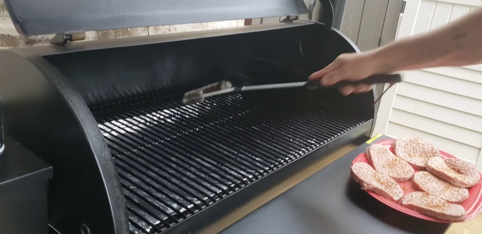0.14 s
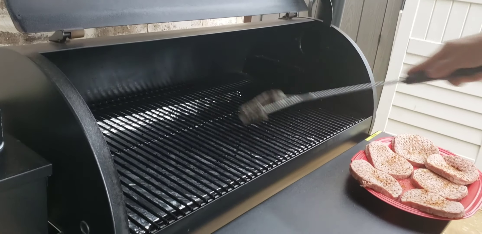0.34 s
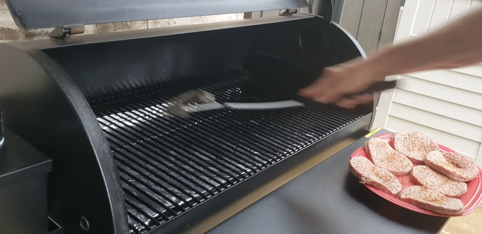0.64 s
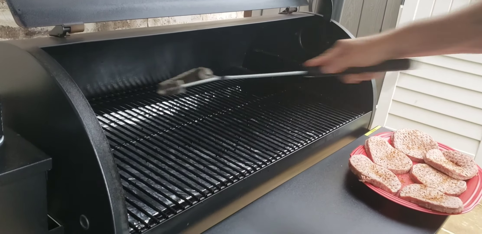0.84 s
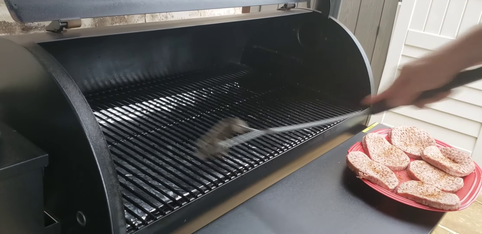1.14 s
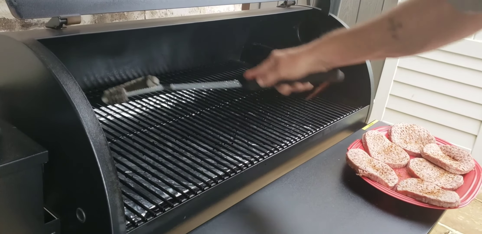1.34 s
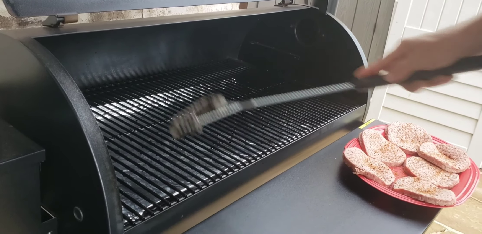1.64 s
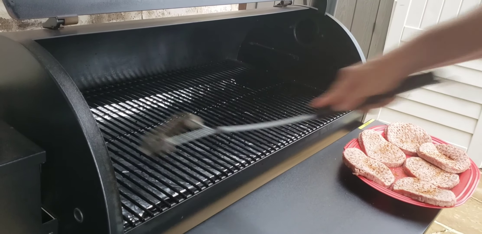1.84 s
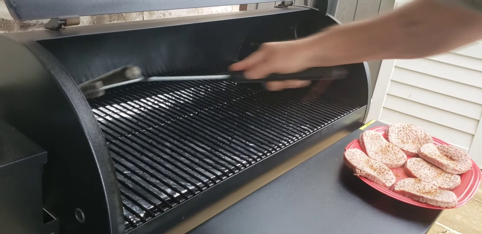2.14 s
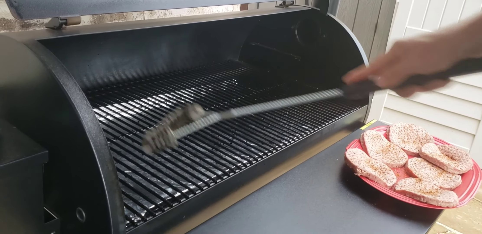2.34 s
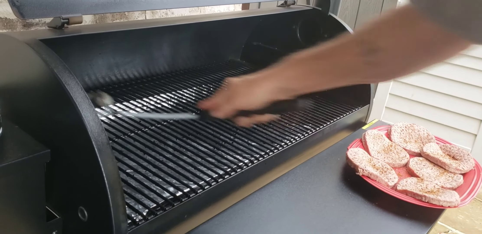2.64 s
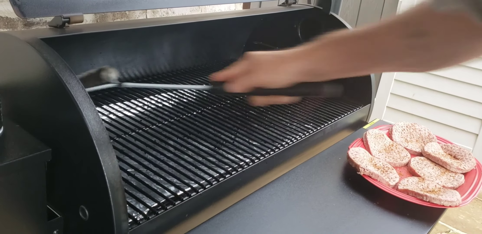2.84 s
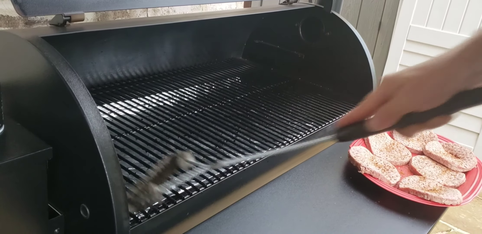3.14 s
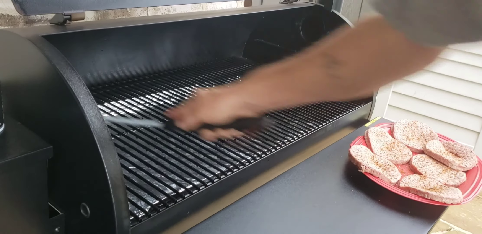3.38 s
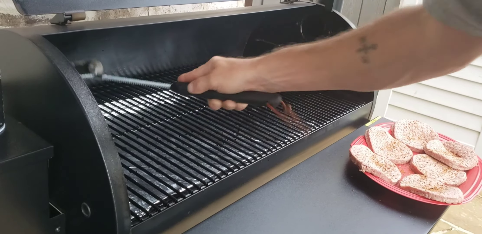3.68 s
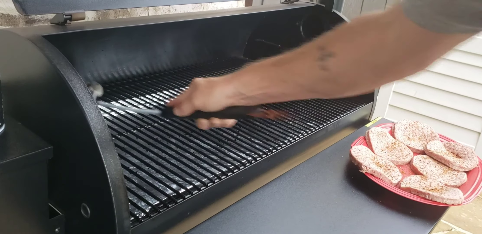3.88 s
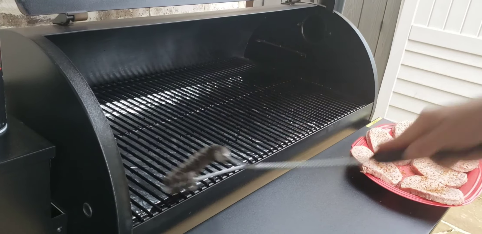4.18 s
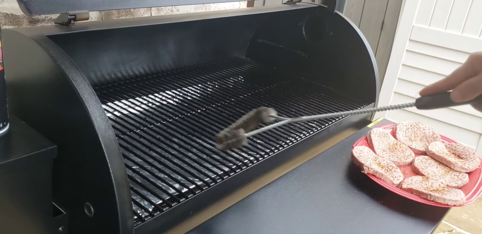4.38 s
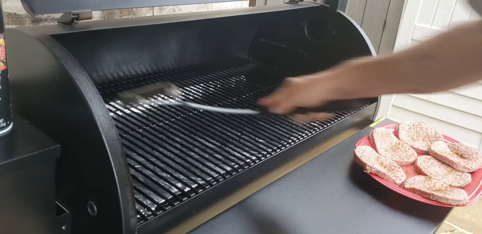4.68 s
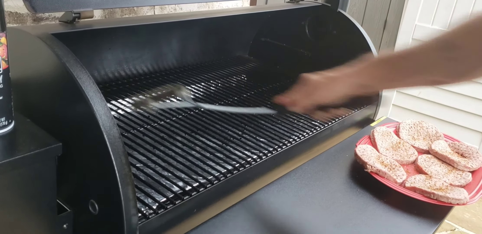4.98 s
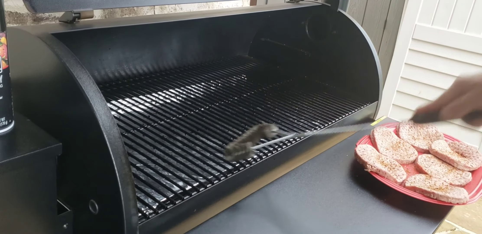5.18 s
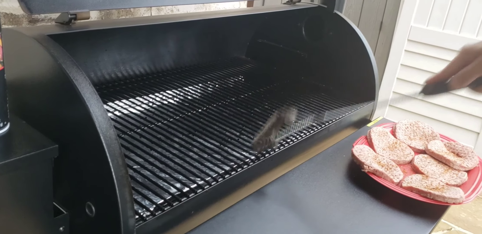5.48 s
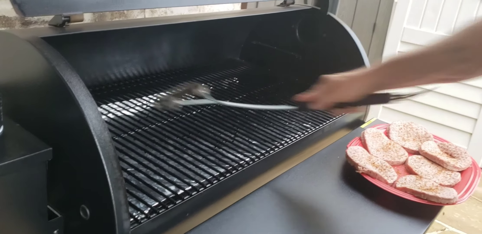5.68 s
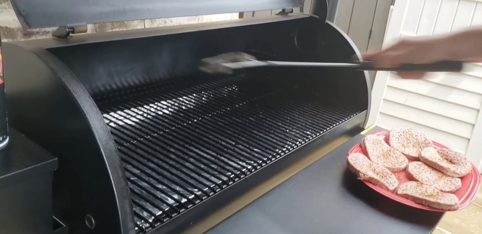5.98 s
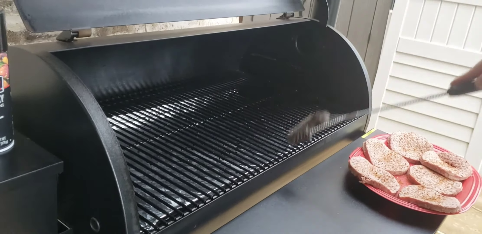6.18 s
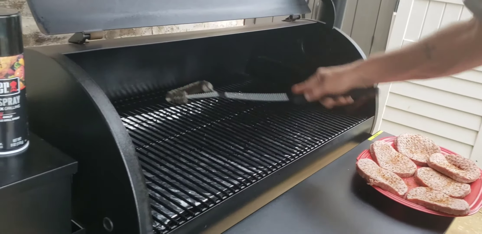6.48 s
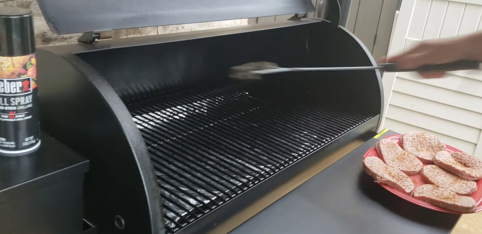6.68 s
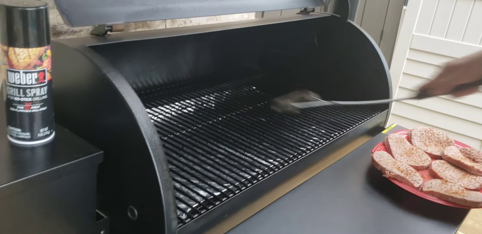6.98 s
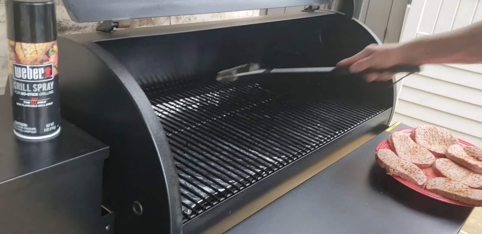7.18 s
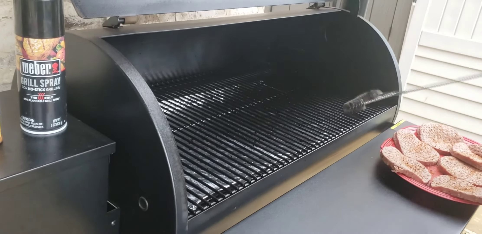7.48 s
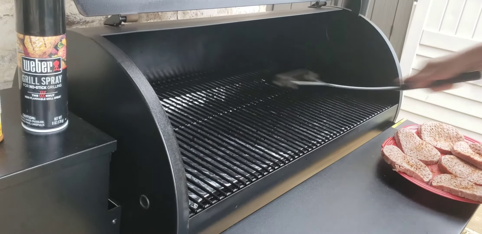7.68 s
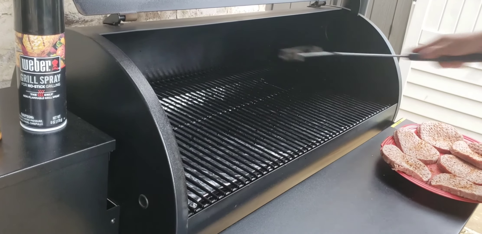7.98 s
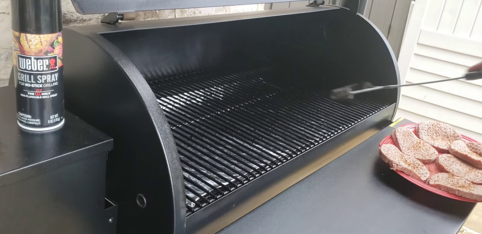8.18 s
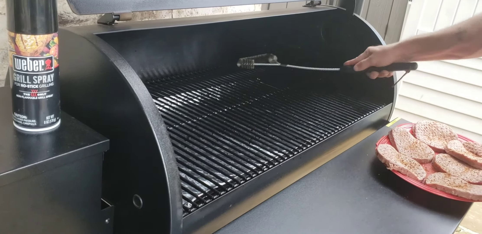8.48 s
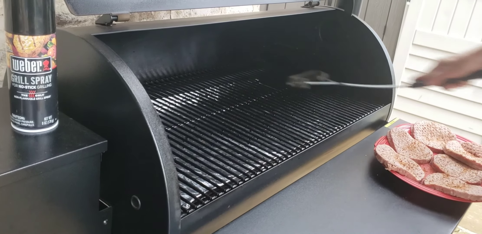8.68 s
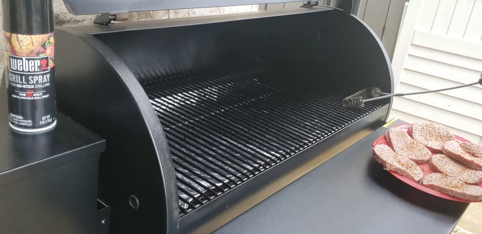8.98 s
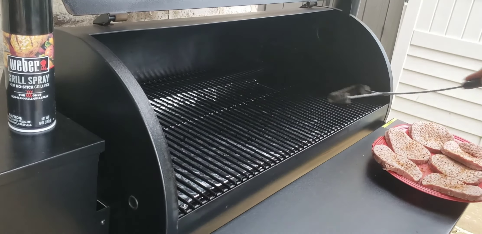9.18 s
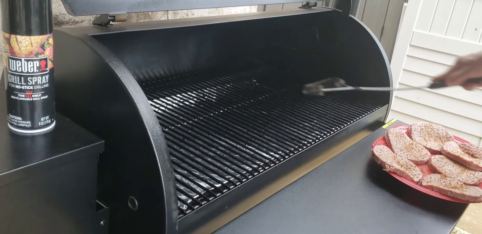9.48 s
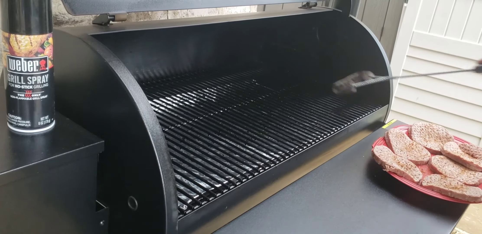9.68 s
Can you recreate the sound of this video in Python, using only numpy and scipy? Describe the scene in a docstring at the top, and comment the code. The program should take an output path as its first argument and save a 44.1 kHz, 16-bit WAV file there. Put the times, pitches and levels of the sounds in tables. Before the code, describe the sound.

An open barrel grill drones steadily outdoors, its fan motor humming under a soft rush of fire. A wire brush scrubs the metal grate in quick, repeated strokes, each a bright, scratchy hiss with occasional tiny snaps and thin squeaks. Many strokes make the loose grate clatter and the barrel give a short, low boom. The brushing gets lighter near the end. It is heard from about an arm's length.

```python
"""Outdoors at an open barrel grill, a wire brush scrubs the grate about an arm's length from a phone. The fan-
fed fire drones at the pitches the barrel favours, over the hum of the fan motor. On each stroke the bristles
hiss along the bars; wires squeak as the brush lands, and some catch and snap free. The brush head makes the
loose grate clatter, and the barrel answers with a low boom."""
import sys
import numpy as np
from scipy import signal
from scipy.fft import rfft, irfft, next_fast_len
from scipy.io import wavfile

SR = 44100
rng = np.random.default_rng(int(sys.argv[2]) if len(sys.argv) > 2 else 0)


def master(y):
    """Save y as 16-bit WAV."""
    cut = np.clip(np.atleast_2d(y).T, -1, 1)
    pcm = np.round(cut * 32767)  # scale
    wavfile.write(sys.argv[1], SR, pcm.astype(np.int16))


N = 433503
TIME = np.arange(N) / SR
TOP_HZ = 15780  # the phone cuts off sound above this

# the broad rush of fan and flame: pitch_hz, level_db
FIRE_RUSH = [(28, -88), (48, -71), (400, -100), (750, -68.5), (1100, -75), (1400, -77), (1850, -80.5),
             (2500, -80), (3400, -86), (5000, -88), (6500, -94.5), (7600, -94.5), (9000, -101),
             (15500, -100.5)]
# where the air in the barrel and fire pot rings: pitch_hz, width_hz, level_db, change_when_aside_db
BARREL_RESONANCES = [(62.7, 13, -59.5, 1), (78, 18, -65.5, -7), (90, 8, -74, -4), (119, 14.5, -45.5, -0.5),
                     (130.4, 19.5, -48.5, 0.5), (142.7, 9.4, -46.5, -8), (192.3, 22.6, -52.5, -1),
                     (223, 18, -51, -2.5), (249, 16, -56.5, 4.5), (257, 31, -58, -3),
                     (308.8, 42.6, -52.5, -4), (379, 35, -66, 1), (450.4, 23, -54.5, 1.5),
                     (482, 23, -54, 3), (517, 79, -62, -4), (576, 21.5, -66, 3.5), (681, 72, -70.5, 6),
                     (908, 26, -64.5, -4.5), (1043, 21, -69, 3.5), (1161, 43, -64, -2.5),
                     (1285, 72, -69, -3), (1386, 31, -67.5, -2.5), (1526.5, 85, -63.5, 0.5),
                     (1681, 33, -68.5, -1.5), (1924, 22, -69, -5), (2137, 86, -78, 6)]
# the phone moves aside: time_s, share_of_the_way (0 to 1)
PHONE_MOVE = [(5.5, 0.28), (7.6, 1)]
# the fan's motor hums and its blades whine: pitch_hz, level_db
FAN_TONES = [(60.5, -54), (113, -42), (242, -44), (451, -42.5), (1532, -54)]
# the barrel booms as the grate shifts on its ledges: time_s, level_db
BARREL_BOOMS = [(0.496, -18.5), (1.064, -15.5), (1.811, -17), (2.499, -27), (4.479, -23), (5.461, -19),
                (5.557, -18), (6.249, -23), (6.997, -20), (7.693, -15.5)]
# the brush head jolts the grate: start_s, level_db, low_ring_db, crunch_db, fade_s, thump_hz, clank_hz
GRATE_JOLTS = [ (0.0, -44, 18.5, 34, .013, 320, 2900), (0.414, -25, 7.5, -3, .018, 343, 3320),
               (.573, -34, 10, 19, .028, 320, 2970), (1.028, -33, 6, 15, 0.033, 320, 2380),
               (1.041, -16, 0, 8, 0.012, 537, 2380), (1.202, -41, 15, 21, 0.015, 320, 2400),
               (1.701, -28.5, 7.5, -3, .025, 500, 2700), (2.403, -29, 3.5, 1, 0.034, 295, 3000),
               (3.086, -33, 2, 6, 0.023, 295, 3090), (3.418, -40, 7, 8, .02, 310, 2900),
               (3.718, -36, -12, 7, 0.045, 310, 3100), (4.414, -32, -2, 8, .023, 320, 2300),
               (4.431, -19, 3.5, 2.5, .022, 316, 2300), (4.582, -35, 8.5, 2, 0.045, 300, 2630),
               (5.439, -20, 5, 10.5, 0.045, 346, 3200), (5.47, -15.5, 0, 6, 0.02, 570, 2520),
               (6.167, -25.5, 6, 0, 0.016, 295, 2230), (6.19, -22.5, 4.5, 2, 0.024, 320, 2240),
               (6.363, -30, 6, -4, 0.027, 493, 2200), (6.82, -23, 2, -16, 0.013, 390, 3100),
               (6.864, -25.5, 5, -5, 0.028, 396, 3140), (6.983, -33.5, 10.5, -8, 0.024, 506, 2190),
               (7.629, -18.5, -2.5, -4, .018, 592, 2290), (7.656, -20.5, -0.5, -5, .009, 620, 2290),
               (8.275, -21.5, -2, -10, 0.0073, 506, 2350)]
# the tone of a blow on the grate: pitch_hz, level_db
BLOW_TONE = [(80, -17), (180, 8.5), (450, 1.5), (750, 5), (1300, 0.5), (1750, 1), (2400, -1), (3050, 0.5),
             (3500, -6.5), (5700, -13.5), (6800, -23.5), (7800, -20.5), (9000, -36), (16000, -24)]
# where the grate rings: pitch_hz, width_hz, boost_db
GRATE_RESONANCES = [(305, 115, 7.5), (406, 54, 6.5), (565, 38, 7), (637, 13.5, 7.5), (760, 30, 4),
                    (1003, 63, 10.5), (1180, 71, 0), (1277, 150, 9), (2060, 84, 4), (2190, 50, 1.5),
                    (2330, 140, 5.5), (2500, 31, -3), (2930, 44, 6), (3160, 45, 2), (4470, 77, 3)]
# how long the grate's ring takes to fade by 60 dB: pitch_hz, ring_s
GRATE_RING_TIMES = [(250, 0.65), (500, 0.44), (1000, 0.48), (2000, 0.3), (4000, 0.2), (8000, 0.092)]
# wires squeak, mostly as the brush lands: start_s, level_db, pitch_hz
WIRE_SQUEAKS = [(1.6851, -34, 12300), (2.3955, -35, 15400), (3.7244, -34, 15000), (6.8074, -36, 15100),
                (7.4295, -42, 12200), (8.6444, -33, 12200)]
# a tuft catches on a bar, rasps as it bends and snaps free: snap_time_s, rasp_db, snap_db
TUFT_CATCHES = [ (.036, -50, -42), (.1905, -60, -42), (.597, -38, -38), (.635, -48, -28), (.648, -50, -32),
                (.7214, -54, -47), (.9393, -58, -37), (1.21, -42.5, -48), (1.5945, -46, -41),
                (2.0946, -60, -40), (3.4017, -41.5, -34), (4.5974, -46, -35), (4.755, -43, -46),
                (5.4784, -36, -25), (6.3405, -42, -24.5), (6.695, -56, -60), (7.0683, -54, -37),
                (8.263, -36, -23), (8.66, -53, -48)]
# the tone of a snapping wire: pitch_hz, level_db
SNAP_TONE = [(800, -21), (3000, -27), (5500, -4), (9000, -10.5), (12000, 6), (16000, -10)]
# the brush lands, speeds up, slows and lifts off: start_s, speed_up_s, slow_down_s, landing_db, sliding_db
BRUSH_STROKES = [ (-.012, .04, .14, -36, -56), (0.396, 0.18, .14, -47, -42.5),
                 (1.003, .19, 0.15, -38, -44.5), (1.671, .17, 0.17, -39, -44.5),
                 (2.383, .17, 0.16, -39, -45.5), (3.073, 0.15, 0.42, -39.5, -47),
                 (3.71, .33, 0.21, -40, -43.5), (4.396, 0.17, .25, -40, -44), (4.8, 0.24, .17, -58, -44),
                 (5.424, 0.18, .23, -40, -48), (6.152, .2, .18, -45, -43.5),
                 (6.795, 0.21, 0.12, -45, -43.5), (7.418, 0.24, 0.12, -49, -44),
                 (8.046, 0.25, 0.24, -44, -46.5), (8.44, .19, .28, -64, -44.5),
                 (8.938, 0.074, .17, -66, -53), (9.12, 0.23, .22, -52, -49.5), (9.735, .06, .15, -48, -52)]
# the hiss of the sliding bristles, as coloured by the phone's microphones: pitch_hz, level_db
HISS_AS_HEARD = [(300, -2), (1000, 12), (2000, 6.5), (3000, 6.5), (5200, -0.5), (6600, -3.5), (7500, 1),
                 (8700, -7.5), (10000, -4.5), (11500, -1), (12200, 6.5), (13000, -2), (14900, 6.5),
                 (16000, 4)]
# how alike the two microphones sound: pitch_hz, likeness (0 to 1)
MIC_LIKENESS = [(130, 1), (290, 0.98), (480, 0.97), (700, 0.33), (1410, 0.42), (3100, 0.019), (6800, 0.011)]
# the two microphone openings hear differently: pitch_hz, left_minus_right_db
MIC_BALANCE = [(110, 1), (380, -1.5), (800, 1.8), (1400, 2.5), (2400, -4.5), (3500, -5.5), (5500, -12),
               (7500, -3), (9500, -0.5), (12000, -2), (15500, 5.5)]


def gain(db):
    """Turn decibels into a number to multiply by."""
    return 10 ** (np.asarray(db) / 20)


def normalize(x):
    """Scale a signal to an average strength (rms) of 1."""
    return x / np.sqrt(np.mean(x ** 2))


def look_up(table, hz):
    """Read between the rows of a (pitch_hz, value) table, with octaves evenly spaced."""
    pitches, values = np.transpose(table)
    return np.interp(np.log(hz + 1e-9), np.log(pitches), values)


def peak(hz, centre, width):
    """The hump of a resonance: 1 at its centre, falling away on both sides."""
    return 1 / (1 + (1.462 * (hz - centre) / width) ** 2)


def filtered(x, gain_at):
    """Turn each frequency f up or down by gain_at(f)."""
    size = next_fast_len(x.shape[-1] + 4096)
    hz = np.fft.rfftfreq(size, 1 / SR)
    return irfft(rfft(x, size) * gain_at(hz), size)[..., :x.shape[-1]]


def stereo_noise(size):
    """Left and right noise: alike in the bass, unrelated in the treble."""
    def likeness(f):
        return np.clip(look_up(MIC_LIKENESS, f), 0, .995)
    shared = filtered(rng.standard_normal(size), lambda f: np.sqrt((1 + likeness(f)) / 2))
    apart = filtered(rng.standard_normal(size), lambda f: np.sqrt((1 - likeness(f)) / 2))
    return np.array([shared + apart, shared - apart])


def wander(rate_hz):
    """A smooth random drift that changes about rate_hz times a second."""
    return normalize(filtered(rng.standard_normal(N), lambda f: np.exp(-(f / rate_hz) ** 2)))


def clicks(per_s, scatter_db, size):
    """Tiny knocks of uneven strength at random moments."""
    hits = rng.random(size) < per_s / SR
    signs = np.sign(rng.standard_normal(size))
    strengths = gain(scatter_db * np.minimum(rng.exponential(size=size), 4))
    return normalize(hits * signs * strengths)


def swell(start_s, rise_s, fade_s):
    """A loudness curve that rises to 1 and dies away."""
    age = TIME[:SR]
    curve = (1 - np.exp(-age / rise_s)) * np.exp(-age / max(fade_s, .001))
    wait = np.zeros(max(int(start_s * SR), 0))
    return np.concatenate([wait, curve / curve.max(), np.zeros(N)])[:N]


def fire(flutter_db=0.5):
    """Swirling flame and fan air drone in the barrel; as the phone moves, other pitches stand out."""
    air = stereo_noise(N) * np.sqrt(SR / 2)
    def tone(f, place):
        ringing = sum((gain(db + place * change_db) * peak(f, hz, width)) ** 2
                      for hz, width, db, change_db in BARREL_RESONANCES)
        return np.sqrt(gain(look_up(FIRE_RUSH, f)) ** 2 + ringing)
    drone_at_start = filtered(air, lambda f: tone(f, place=0))
    drone_aside = filtered(air, lambda f: tone(f, place=1))
    moved = np.interp(TIME, *np.transpose(PHONE_MOVE))
    drone = (1 - moved) * drone_at_start + moved * drone_aside
    return drone * gain(flutter_db * wander(rate_hz=4.5))


def fan(speed_drift=0.00284):
    """The motor hums and the blades whine, drifting in pitch together."""
    motor_time = np.cumsum(1 + speed_drift * wander(rate_hz=1.502)) / SR
    return sum(gain(db) * np.sqrt(2) * np.sin(2 * np.pi * hz * motor_time) for hz, db in FAN_TONES)


def barrel_booms(level_db=-2, pitch_hz=116, pitch_range_hz=6, rise_s=0.013, fade_s=0.029):
    """The barrel's main low note swells and fades after a shove."""
    out = np.zeros(N)
    for time_s, db in BARREL_BOOMS:
        detune, phase = rng.random(2)
        hz = pitch_hz + pitch_range_hz * (detune - .5)
        loudness = gain(db + level_db) * swell(time_s - rise_s / 2, rise_s, fade_s)
        out += loudness * np.sin(2 * np.pi * (hz * TIME + phase))
    return out


def grate_ring(knocks, crack_s=0.0048):
    """Each knock gives a short crack from the bars, then a ring in the barrel; the treble dies first."""
    age = TIME[:SR // 3]
    noise = stereo_noise(len(age))  # new for each place that is struck
    octaves_hz = 250 * 2. ** np.arange(6)
    ring = 0
    for hz, shares in zip(octaves_hz, np.eye(len(octaves_hz))):
        ring_s = look_up(GRATE_RING_TIMES, hz)
        band = filtered(noise, lambda f: look_up(np.transpose([octaves_hz, shares]), f))
        ring += band * np.exp(-np.log(1000) * age / ring_s) / np.sqrt(ring_s)
    ring *= 1 + np.exp(-age / crack_s)
    ring /= np.sqrt(np.sum(ring ** 2) / 2)
    return signal.fftconvolve(knocks[None] / np.linalg.norm(knocks), ring, axes=1)


def grate_clatter(level_db=3, low_hz=1400, crunch_hz=4400, thump_db=5, clank_db=3):
    """A jolt rattles the grate on its ledges: weight brings out the low ring, burnt crust the crunch."""
    out = np.zeros((2, N + SR))
    for start_s, db, low_ring_db, crunch_db, fade_s, thump_hz, clank_hz in GRATE_JOLTS:
        def jolt_tone(f):
            low_ring = low_ring_db / (1 + (f / low_hz) ** 4)
            crunch = crunch_db * f ** 4 / (f ** 4 + crunch_hz ** 4)
            # where the blow lands decides which panel thumps and which bar clanks
            thump = thump_db * peak(f, thump_hz, width=110)
            clank = clank_db * peak(f, clank_hz, width=650)
            return gain(db + low_ring + crunch + thump + clank)
        loudness = swell(0, rise_s=0.004, fade_s=fade_s)[:SR // 5]
        knocks = clicks(per_s=1800, scatter_db=2.5, size=len(loudness)) * loudness
        rattle = grate_ring(knocks) * np.linalg.norm(loudness)
        first = max(int(start_s * SR), 0)
        out[:, first:first + rattle.shape[1]] += filtered(rattle, jolt_tone)
    def grate_tone(f):
        boost_db = sum(db * peak(f, hz, width) for hz, width, db in GRATE_RESONANCES)
        return gain(level_db + look_up(BLOW_TONE, f) + boost_db)
    return filtered(out[:, :N], grate_tone)


def wire_squeaks(level_db=-5, width_hz=220):
    """A few wires stick and slip, singing for a moment at their own very high pitch."""
    out = np.zeros((2, N))
    waver = normalize(filtered(rng.standard_normal((2, N)), lambda f: peak(f, 0, width_hz)))
    for start_s, db, hz in WIRE_SQUEAKS:
        loudness = gain(db + level_db) * swell(start_s, rise_s=0.0062, fade_s=0.014)
        out += loudness * np.sin(2 * np.pi * hz * TIME) * waver
    return out


def wire_snaps(level_db=-4, echo_db=-9):
    """A bent wire springs free: a sharp tick with a short echo off the lid."""
    loudness = np.zeros(N)
    for time_s, _, snap_db in TUFT_CATCHES:
        tick = swell(time_s, rise_s=.0003, fade_s=0.0016)
        echo = gain(echo_db) * swell(time_s, rise_s=0.0022, fade_s=0.023)
        loudness += gain(snap_db + level_db) * (tick + echo)
    return filtered(loudness * rng.standard_normal((2, N)), lambda f: gain(look_up(SNAP_TONE, f)))


def hiss_shimmer(count=5000, lowest_hz=6500, fade_s=.009):
    """Brief, thin, high tones at random pitches make the hiss glitter."""
    age = TIME[:SR // 42]
    out = np.zeros((2, N + SR))
    for when, height, *phases in rng.random((count, 4)):
        hz = lowest_hz + height * (TOP_HZ - lowest_hz)
        tone = np.sin(2 * np.pi * (hz * age + np.array(phases)[:, None]))
        first = int(when * N)
        out[:, first:first + len(age)] += tone * np.exp(-age / fade_s)
    return normalize(out[:, :N])


def brush_strokes(landing_speed=0.26, settle_s=0.01, splash_fade_s=0.036, bend_s=.012, relax_s=.022):
    """How loud the hiss is: a splash on landing, a swell with the arm's speed, a rasp at each catch."""
    power = np.zeros(N)
    for start_s, speed_up_s, slow_down_s, landing_db, sliding_db in BRUSH_STROKES:
        touching = (TIME >= start_s) & (TIME < start_s + speed_up_s + slow_down_s)
        age = TIME[touching] - start_s
        swing = np.minimum(age / speed_up_s, 1) ** 2
        braking = np.clip(1 - (age - speed_up_s) / slow_down_s, 0, 1)
        speed = (landing_speed + (1 - landing_speed) * swing) * braking  # 1 is full speed
        contact = 1 - np.exp(-(age / settle_s) ** 2)  # the wires take a moment to reach the bars
        splash = gain(landing_db) * np.exp(-np.maximum(age - settle_s, 0) / splash_fade_s)
        slide = gain(sliding_db) * speed ** 1.07
        power[touching] += contact ** 2 * (splash ** 2 + slide ** 2)
    for time_s, rasp_db, _ in TUFT_CATCHES:
        near = np.abs(TIME - time_s) < .5
        age = TIME[near] - time_s
        rasp = np.exp(np.minimum(age / bend_s, -age / relax_s))  # builds up to the snap, then fades
        power[near] += (gain(rasp_db) * rasp) ** 2
    return np.sqrt(power)


def bristle_hiss(shimmer_db=-6, judder_db=1, puff_s=0.0032):
    """Hundreds of wire tips slip along the bars; the hiss judders as they catch and let go."""
    slips = clicks(per_s=5000, scatter_db=3, size=N)
    # every slip is a tiny fading puff of noise
    puff_power = signal.lfilter([1], [1, -np.exp(-2 / (puff_s * SR))], slips ** 2)
    judder = gain(judder_db * wander(rate_hz=60))
    hiss = normalize(np.sqrt(puff_power)) * judder * stereo_noise(N)
    scrub = brush_strokes() * (hiss + gain(shimmer_db) * hiss_shimmer())
    return filtered(scrub, lambda f: gain(look_up(HISS_AS_HEARD, f)))


def scene():
    """The running grill and everything the brush does to it."""
    grill = fire() + fan() + barrel_booms() + grate_clatter()
    return grill + wire_squeaks() + wire_snaps() + bristle_hiss()


def record(dry, bass_cut_hz=34):
    """Each microphone gives its side its own tone; the phone thins the deep bass and cuts the very top."""
    def mic_tone(f):
        left_right = gain(np.outer([.5, -.5], look_up(MIC_BALANCE, f)))
        bass_cut = f ** 2 / np.hypot(f ** 2, bass_cut_hz ** 2)
        return left_right * bass_cut
    top_cut = signal.ellip(12, .1, 80, TOP_HZ, fs=SR, output="sos")
    return signal.sosfilt(top_cut, filtered(dry, mic_tone))


dry = scene()
out = record(dry)
master(out)
```